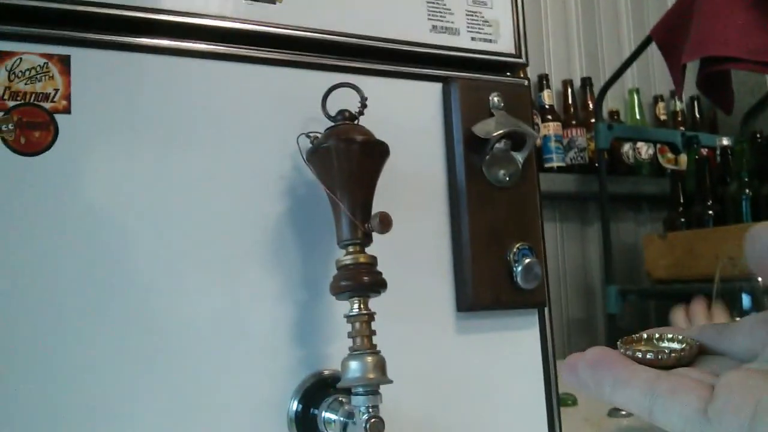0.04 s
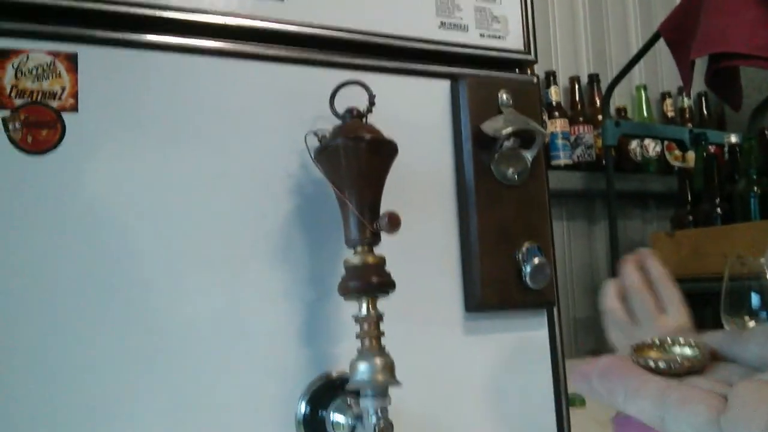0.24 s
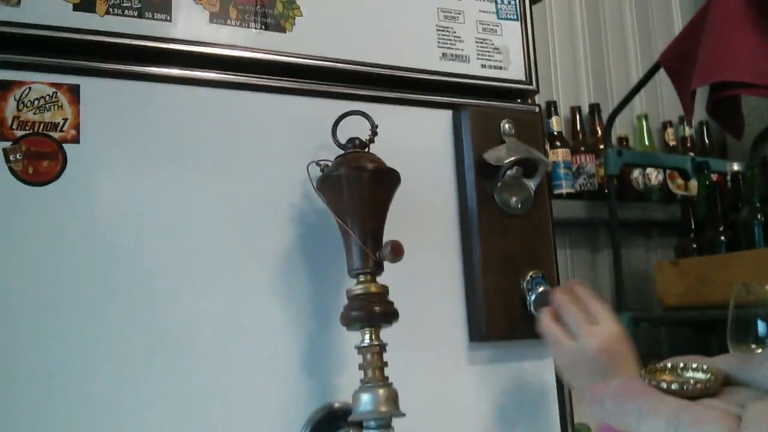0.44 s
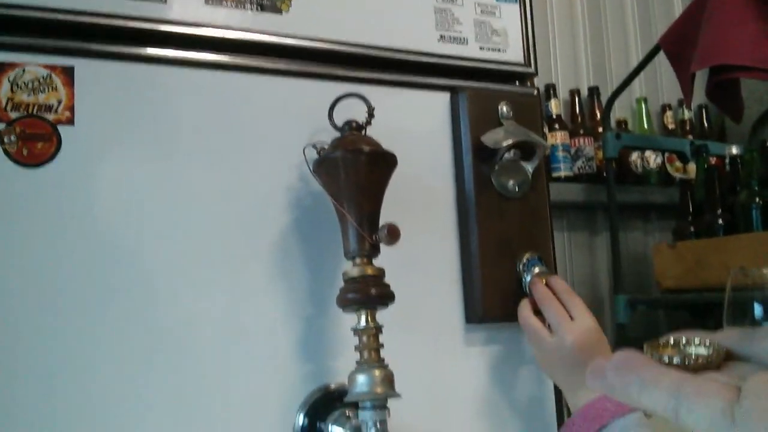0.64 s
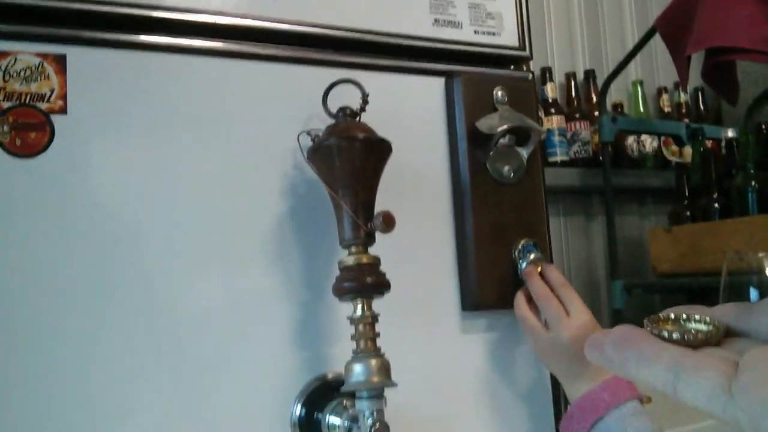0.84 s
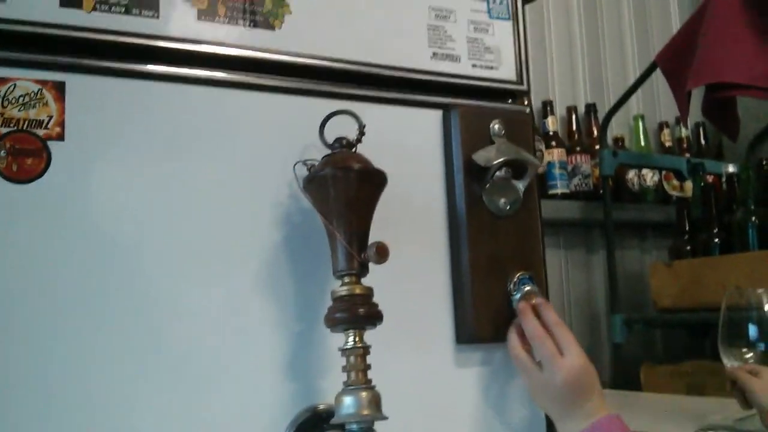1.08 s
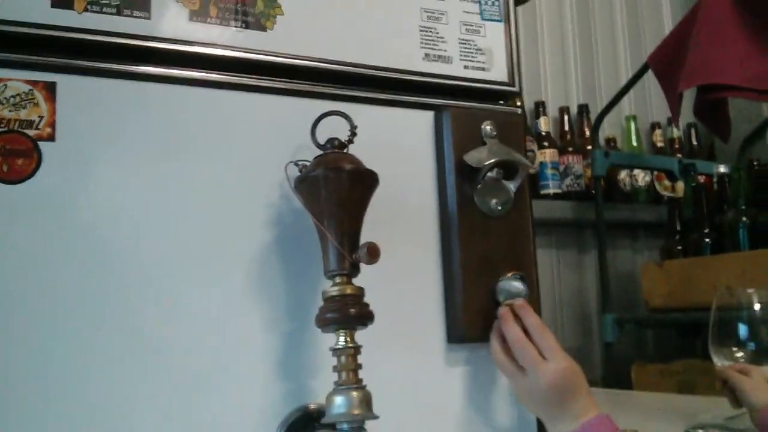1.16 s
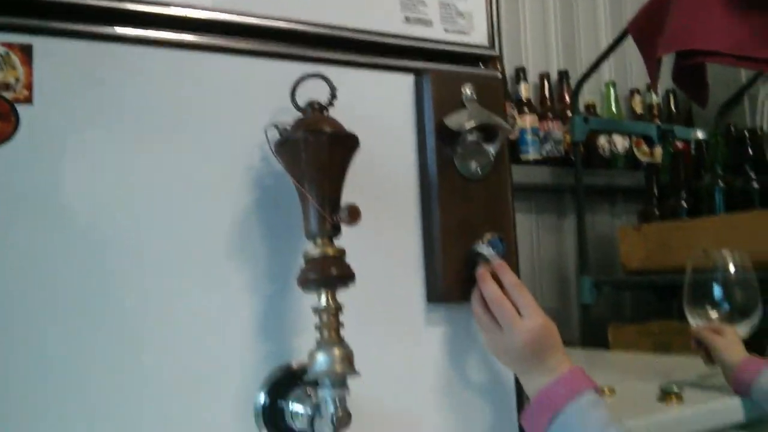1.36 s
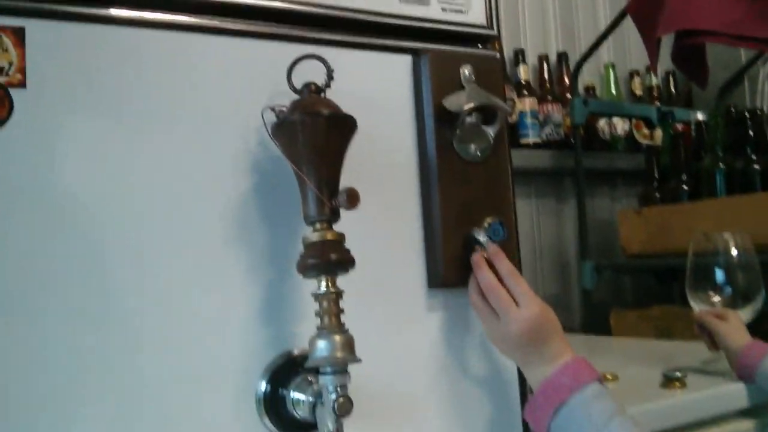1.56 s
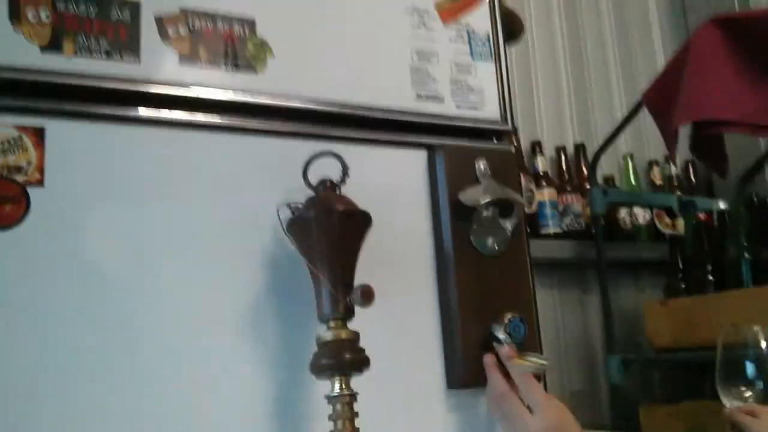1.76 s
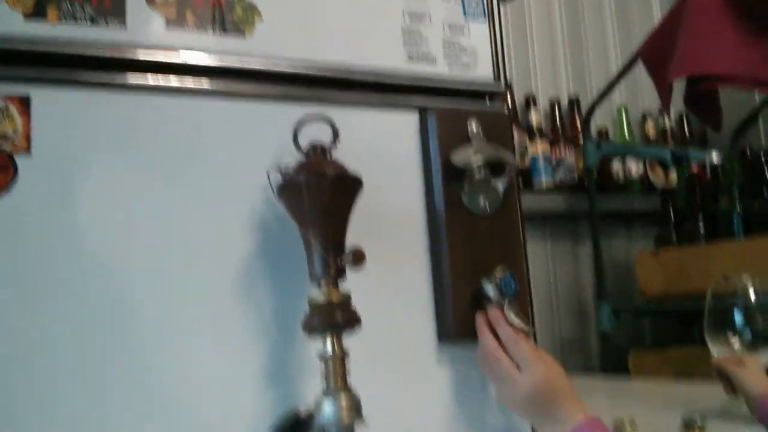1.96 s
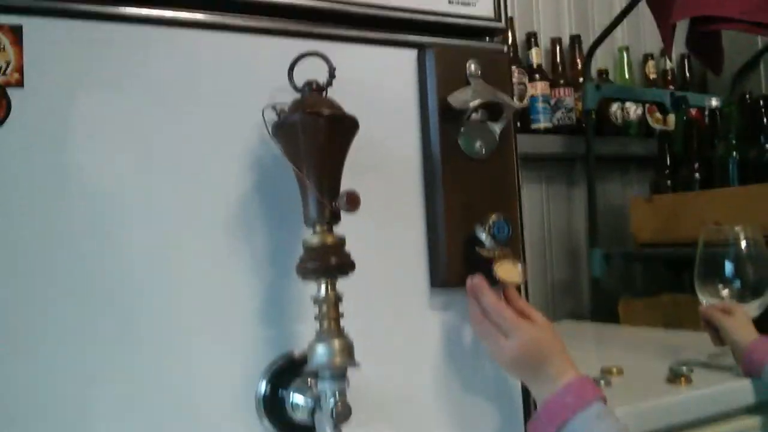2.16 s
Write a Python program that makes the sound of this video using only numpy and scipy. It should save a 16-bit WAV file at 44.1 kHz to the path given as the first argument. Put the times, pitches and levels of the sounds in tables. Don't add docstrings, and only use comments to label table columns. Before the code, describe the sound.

Steel bottle caps snap sharply onto a magnet on a wooden board in a small room

```python
import sys
import numpy as np
from scipy import signal
from scipy.fft import rfft, irfft, next_fast_len
from scipy.io import wavfile
from scipy.ndimage import uniform_filter1d, map_coordinates

SR = 44100
rng = np.random.default_rng(int(sys.argv[2]) if len(sys.argv) > 2 else 0)


def int16_out(signal):
    q = np.round(np.clip(np.atleast_2d(signal).T, -1, 1) * 32767)
    wavfile.write(sys.argv[1], SR, q.astype(np.int16))


def level_to_linear(level):
    exponent = np.asarray(level, float) / 20
    return 10 ** exponent


N = 97946

# f/Hz, level/dB
RUMBLE_SPECTRUM = [(12, -38.5), (20, -22), (43, 8), (162, -5.5), (225, 3), (295, -12.5), (330, -6),
                   (354, -13), (600, -32.5), (780, -49), (1320, -120)]
# f/Hz, level/dB
AIR_SPECTRUM = [(320, -48.5), (550, -16.5), (714, 1.5), (1310, -8), (2200, -40), (2860, -72.5),
                (4840, -120)]
# f/Hz, width/Hz, level/dB
MOTOR_BANDS = [
    (325.4, 5.3, -58),
    (250.8, 8.8, -63),
    (678, 62, -74),
    (55.5, 10, -86.5),
]
# f/Hz, width/Hz, level/dB
LATE_TONE = (481, 9, -68)
LATE_TONE_S = (1.78, 1.9, 2.05, 2.2)
# f/Hz, level/dB
RUSTLE_SPECTRUM = [(880, -32), (1500, -1), (2060, -9), (2660, -11.5), (3590, -12.5), (5170, 0),
                   (16000, -13)]
# t/s, level/dB
STIR_LEVEL = [(0, -80), (.22, -78), (.35, -82.5), (.5, -82), (.75, -71), (1, -76.5), (1.55, -70.5),
              (1.8, -79), (2.2, -73)]
# t/s, rise/s, fade/s, level/dB
BRUSHES = [
    (1.58, .07, .26, -64),
    (1.82, .03, .08, -77),
    (1.17, .027, .01, -60),
    (1.925, .01, .004, -66),
    (.513, .006, .006, -56),
]
# f/Hz, width/Hz, level/dB
BRUSH_MODES = [(4400, 300, -6), (6100, 1200, 0), (7320, 3200, -3.5)]
# from t/s, to t/s, from f/Hz, to f/Hz, level/dB
SQUEAK_GLIDES = [
    (.96, 1.09, 3650, 3880, -75),
    (.84, 1.1, 2700, 2750, -85),
    (1.83, 1.875, 5000, 5000, -74),
    (0, .16, 1850, 1850, -80),
    (0, .13, 3000, 3000, -86),
]
# t/s, f/Hz, level/dB, T60/s, rise/s
BOARD_TAPS = [
    (.5235, 1270, -33, .07, .003),
    (1.609, 1150, -39, .075, .012),
    (1.724, 800, -47, .075, .012),
    (1.968, 1150, -36, .07, .006),
    (1.852, 235, -45, .12, .012),
    (1.872, 200, -45, .12, .012),
]
# f/Hz, width/Hz, level/dB
BOARD_MODES = [(120, 40, 0), (192.8, 46.8, 4.5), (699, 21, -3), (1130, 234, -8)]
# f/Hz, T60/s
ROOM_T60 = [(200, 0.63), (1500, 0.22), (4500, 0.26), (8000, 0.24), (14000, 0.25)]
# f/Hz, level/dB
CRACK_SPECTRUM = [(350, -56.5), (600, -32), (698, -27), (869, -20), (2830, -16), (3120, -14), (5330, -15),
                  (7410, 0.5), (16000, -29.5)]
# t/s, peak level/dB, burst/s, board level/dB
TICK_HITS = [(.039, -64, .0012, -95), (.146, -59, .0012, -95), (.739, -55, .0015, -95),
             (1.014, -60, .001, -95), (1.044, -57, .002, -95), (1.851, -57, .0015, -95)]
# t/s, peak level/dB, burst/s, board level/dB
SLIDE_HITS = [(1.088, -53.5, 0.0054, -80), (1.097, -50, 0.0026, -87), (1.1035, -37, 0.0057, -89),
              (1.1150, -38, 0.0033, -83), (1.120, -40.5, 0.0085, -78), (1.128, -44.5, 0.0046, -78),
              (1.143, -56, 0.0045, -87), (1.156, -53, 0.007, -81.5)]
# t/s, peak level/dB, burst/s, board level/dB
NUDGE_HITS = [(1.594, -51.5, 0.013, -69), (1.604, -48, 0.0029, -66), (1.612, -39.5, 0.003, -75.5),
              (1.618, -38.5, 0.0031, -71.5)]
# t/s, peak level/dB, burst/s, board level/dB
RATTLE_HITS = [(1.184, -41.5, 0.0067, -80.5), (1.192, -33.5, 0.0046, -81.5), (1.196, -21.5, 0.0036, -77),
               (1.202, -25, 0.011, -77.5), (1.210, -23.5, 0.0027, -67), (1.2152, -17.5, 0.00099, -60.5),
               (1.221, -28, 0.001, -72.5)]
# t/s, peak level/dB, burst/s, board level/dB
FIRST_HITS = [
    (.5232, -6.5, 0.0011, -27.5),
    (.5248, -12, 0.0014, -39),
    (.5272, -10.5, 0.0026, -30),
    (.530, -15.5, 0.0059, -34.5),
    (.534, -18.5, 0.00092, -44.5),
    (.542, -22, 0.002, -49),
]
# t/s, peak level/dB, burst/s, board level/dB
SECOND_HITS = [
    (1.2305, -15.5, .001, -59.5),
    (1.2316, -4, .0024, -46.5),
    (1.2370, -7, 0.0025, -25),
    (1.2425, -16.5, 0.0023, -28.5),
]
# t/s, peak level/dB, burst/s, board level/dB
THIRD_HITS = [
    (1.9366, -13.5, 0.002, -36),
    (1.9388, -8.5, 0.0018, -32),
    (1.9435, -17.5, 0.00184, -30.5),
    (1.947, -20, 0.0022, -55),
]
# t/s, peak level/dB, burst/s, board level/dB
SETTLE_HITS = [
    (1.9620, -4, 0.0024, -39.5),
    (1.9662, -17, 0.0018, -40.5),
    (1.9715, -20, 0.0023, -36),
    (1.979, -19, .003, -39.5),
]
# t/s, peak level/dB, burst/s, board level/dB
TILT_HITS = [
    (1.9645, -26, 0.004, -55),
    (1.9685, -21, 0.004, -60),
]
# f/Hz, width/Hz, level/dB
TICK_MODES = [(6160, 280, 6.5), (8070, 700, 2.5), (10400, 900, -13)]
# f/Hz, width/Hz, level/dB
SLIDE_MODES = [(3650, 49, 2), (3670, 33, 14.5), (5470, 130, 0), (5930, 40, -2), (7060, 69, -5),
               (8400, 70, -5)]
# f/Hz, width/Hz, level/dB
NUDGE_MODES = [(3590, 45, -3.5), (4570, 19, 10), (5640, 50, 8), (6350, 100, -0.5), (7900, 45, 1.5)]
# f/Hz, width/Hz, level/dB
RATTLE_MODES = [(3935, 15, 1.5), (4260, 87, -10), (5240, 59, -1), (5900, 270, 2.5), (6490, 60, 7),
                (7200, 120, -3), (8140, 52, 4), (9130, 120, -2.5), (10300, 120, -6), (11000, 140, -15.5),
                (14300, 46, -23)]
# f/Hz, width/Hz, level/dB
FIRST_MODES = [(1390, 31, -13.5), (2148, 38, -9), (3680, 45, -0.5), (4160, 66, 1), (4560, 37, 4),
               (4950, 51, -5.5), (6146, 41, 5), (6600, 190, -12), (8160, 110, -3), (8430, 45, 5),
               (9260, 66, -2), (9470, 34, -6.5), (12670, 70, -19)]
# f/Hz, width/Hz, level/dB
SECOND_MODES = [(3570, 90, -20.5), (4160, 53, -0.5), (4520, 54, 0.5), (5920, 62, 1.5), (6340, 53, 6.5),
                (7220, 58, -2.5), (7800, 26, -9.5), (8600, 60, -1.5), (9100, 70, -5), (9860, 120, -5),
                (10960, 150, -13.5), (12600, 150, -15)]
# f/Hz, width/Hz, level/dB
THIRD_MODES = [(3560, 42, -4.5), (4030, 20, -1.5), (5030, 74, -10.5), (5770, 26, 9.5), (6170, 66, 0),
               (7400, 39, -0.5), (8620, 130, -2), (8800, 54, -10), (11800, 214, -20)]
# f/Hz, width/Hz, level/dB
SETTLE_MODES = [(1434, 14, -17), (3860, 70, -14), (5260, 120, -1), (5720, 93, 3.5), (7520, 85, 10),
                (7910, 82, 8.5), (8200, 72, 6), (9330, 35, -1.5), (10340, 64, -27.5), (13500, 55, -21.5)]
# f/Hz, width/Hz, level/dB
TILT_MODES = [(2650, 60, -9), (3200, 55, 0)]
# f/Hz, width/Hz, level/dB
FIRST_RIM = [(3660, 25, -11.5), (4640, 60, -3), (6100, 60, 4.5), (8180, 50, -2.5), (9100, 60, -7.5)]
# f/Hz, width/Hz, level/dB
SECOND_RIM = [(4760, 50, -11), (6270, 40, -1.5), (6350, 45, 3.5), (7200, 57, -7), (6820, 40, -10)]
# f/Hz, width/Hz, level/dB
SETTLE_RIM = [(4800, 23, 0.5), (5770, 30, -13), (7230, 40, -5.5), (7730, 50, -5.5), (8500, 84, 6.5)]

RUMBLE_DB, AIR_DB, BRUSH_DB = -52, -68.5, 2.5
SNAP_DB, JOSTLE_DB, RUB_DB = -8.5, -18, -24
DAMPING, SPREAD = 5, 1.4
RING_SEND_DB, KNOCK_SEND_DB, WASH_DB, RIM_DB = -6, 1.5, 2, -11
TILT_WET_DB = -7
ROOM_DB, FAR_DB, FAR_T60_TIMES, WALL_S = -6.5, -35, 3.2, 0.0043


def unit(x):
    return x / np.sqrt(np.mean(x ** 2) + 1e-20)


def peak(x):
    return x / np.abs(x).max()


def along(points, hz):
    f, v = np.transpose(points)
    return np.interp(np.log(hz + 1), np.log(f + 1), v)


def wobble(rate_hz):
    knots = rng.standard_normal(int(N * rate_hz / SR) + 4)
    return map_coordinates(knots, [np.arange(N) * rate_hz / SR])


def filtered(x, response):
    m = next_fast_len(len(x) + 8192)
    return irfft(rfft(x, m) * response(np.fft.rfftfreq(m, 1 / SR)), m)[:len(x)]


def spectrum(points):
    return lambda f: level_to_linear(along(points, f))


def body(modes, widen=1):
    def response(f):
        total = 0
        for k, (hz, width_hz, db) in enumerate(modes):
            loss = 1j * f * width_hz * widen
            total = total + (-1) ** k * level_to_linear(db) * loss / (hz * hz - f * f + loss)
        return total
    return response


def noise(response):
    return unit(filtered(rng.standard_normal(N), response))


def soft(f):
    return 1 / (1 + (f / 9400) ** 6)


def drone(hz, width_hz, db):
    phase = 2 * np.pi * np.cumsum(hz + width_hz * wobble(30)) / SR
    return level_to_linear(db + 1.6 * wobble(11)) * np.sqrt(2) * np.sin(phase)


def cooler():
    out = level_to_linear(RUMBLE_DB + 1.8 * wobble(11)) * noise(spectrum(RUMBLE_SPECTRUM))
    out += level_to_linear(AIR_DB + 0.35 * wobble(1.2) + 0.27 * wobble(6.5)) * noise(spectrum(AIR_SPECTRUM))
    out += drone(*LATE_TONE) * np.interp(np.arange(N) / SR, LATE_TONE_S, [0, 1, 1, .2])
    hum, *bands = MOTOR_BANDS
    out += drone(*hum)
    for hz, width_hz, db in bands:
        out += level_to_linear(db + 0.34 * wobble(11)) * noise(body([(hz, width_hz, 0)]))
    return out


def rustle():
    level_db = np.interp(np.arange(N) / SR, *np.transpose(STIR_LEVEL))
    return level_to_linear(level_db + wobble(9.1)) * noise(spectrum(RUSTLE_SPECTRUM))


def brush():
    t, rub = np.arange(N) / SR, np.zeros(N)
    for s, rise, fade, db in BRUSHES:
        rub += level_to_linear(db) * np.interp(t, [s, s + rise, s + rise + fade], [0, 1, 0]) ** 2
    return rub * level_to_linear(BRUSH_DB + 1.2 * wobble(90)) * noise(lambda f: body(BRUSH_MODES)(f) * soft(f))


def squeak():
    t, out = np.arange(N) / SR, np.zeros(N)
    for start, end, hz0, hz1, db in SQUEAK_GLIDES:
        phase = 2 * np.pi * np.cumsum(np.interp(t, [start, end], [hz0, hz1])) / SR
        gate = np.clip(np.minimum(t - start, end - t) / .012, 0, 1)
        out += level_to_linear(db) * gate * ((.6 + wobble(400)) * np.sin(phase) + wobble(400) * np.cos(phase))
    return out


def tap():
    sag_per_s = 2.2
    out = np.zeros(N)
    for s, hz, db, t60, rise in BOARD_TAPS:
        t = np.clip(np.arange(N) / SR - s, 0, .2)
        envelope = level_to_linear(db - 60 * t / t60) * (1 - np.exp(-t / rise)) ** 2
        out += envelope * np.sin(2 * np.pi * hz * t * (1 - sag_per_s * t))
    return out


def room(x):
    hz, t, z = signal.stft(rng.standard_normal(len(x)), SR, nperseg=256)
    t60 = along(ROOM_T60, hz)[:, None]
    decay = level_to_linear(-60 * t / t60) + level_to_linear(FAR_DB - 60 * t / t60 / FAR_T60_TIMES)
    tail = signal.istft(z * decay, SR, nperseg=256)[1]
    late = np.pad(x, (round(WALL_S * SR), 0))
    return level_to_linear(ROOM_DB) * signal.fftconvolve(late, tail / np.linalg.norm(tail))[:len(x)]


def scrape(length_s, size):
    u = np.arange(2048) / (SR * 0.84 * length_s)
    shape = u ** 2 * np.exp(2 - 2 * u)
    force = shape * rng.standard_normal(len(u))
    for _ in range(6):
        z = rfft(force)
        force = shape * np.sign(irfft(z / (np.abs(z) + 1e-9)))
    z = rfft(force)
    even = irfft(z / np.sqrt(uniform_filter1d(np.abs(z) ** 2, size=9) + 1e-9))
    return np.pad(even * np.sqrt(shape), (0, size - len(u)))


def cap(contacts, modes, crack_db, colour=np.ones_like, rim=(), wet_db=0):
    out, size = np.zeros(N + SR), 5 * SR // 8
    blow = np.zeros(size)
    blow[0] = 1

    def snap(f):
        return spectrum(CRACK_SPECTRUM)(f) * colour(f)

    def ring(f):
        return body(modes, DAMPING)(f) * colour(f)

    def blurred(f):
        return body(modes, DAMPING * SPREAD)(f) * colour(f)

    knock = peak(filtered(blow, body(BOARD_MODES)))
    wash = unit(filtered(blow, blurred))
    wash = wash + level_to_linear(crack_db + WASH_DB) * unit(filtered(np.roll(blow, 64), snap))
    if rim:
        wash = wash + level_to_linear(RIM_DB) * unit(filtered(blow, body(rim)))
    for s, db, length_s, knock_db in contacts:
        force = scrape(length_s, size)
        ringing = level_to_linear(db - 1) * peak(filtered(force, ring))
        crack = level_to_linear(db + crack_db) * peak(filtered(force, snap))
        board = level_to_linear(knock_db) * knock
        send = level_to_linear(RING_SEND_DB) * ringing + ringing.std() * wash + level_to_linear(KNOCK_SEND_DB) * board
        out[round(s * SR):][:size] += ringing + crack + board + level_to_linear(wet_db) * room(send)
    return out[:N]


def caps():
    out = cap(TICK_HITS, TICK_MODES, SNAP_DB)
    out += cap(SLIDE_HITS, SLIDE_MODES, RUB_DB, soft)
    out += cap(NUDGE_HITS, NUDGE_MODES, RUB_DB, soft)
    out += cap(RATTLE_HITS, RATTLE_MODES, JOSTLE_DB)
    out += cap(FIRST_HITS, FIRST_MODES, SNAP_DB, rim=FIRST_RIM)
    out += cap(SECOND_HITS, SECOND_MODES, SNAP_DB, rim=SECOND_RIM)
    out += cap(THIRD_HITS, THIRD_MODES, SNAP_DB)
    out += cap(SETTLE_HITS, SETTLE_MODES, SNAP_DB, rim=SETTLE_RIM)
    return out + cap(TILT_HITS, TILT_MODES, RUB_DB, soft, wet_db=TILT_WET_DB)


def scene():
    return (cooler() + rustle() + brush() + squeak() + tap() + caps())[None]


def low_pass(x):
    return signal.sosfilt(signal.butter(12, 16980, fs=SR, output="sos"), x)


def record(dry):
    ceiling, top_hz = .8, 15900
    x = dry[0] / (1 + np.abs(dry[0] / ceiling) ** 4) ** .25
    mix = filtered(x, lambda hz: 1 / (1 + (hz / top_hz) ** 120))[None]
    return low_pass(mix)


dry = scene()
out = record(dry)
int16_out(out)
```